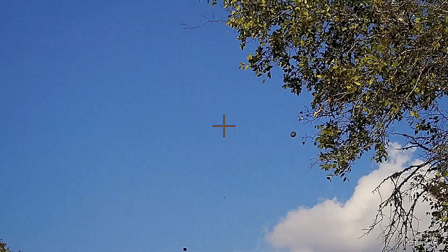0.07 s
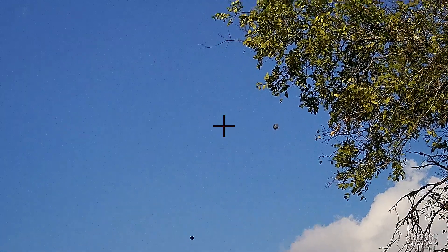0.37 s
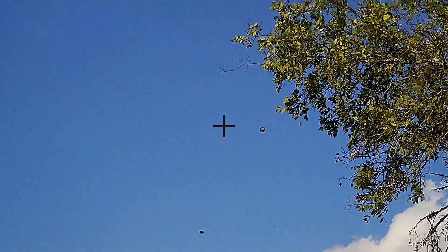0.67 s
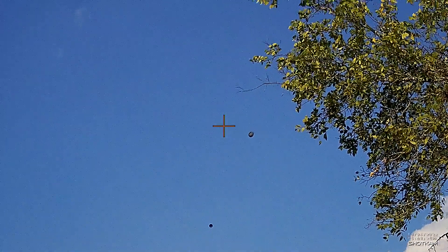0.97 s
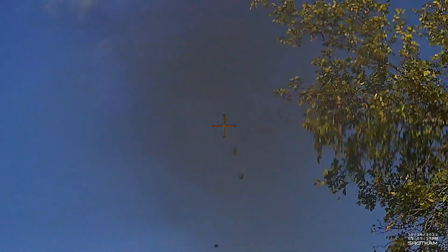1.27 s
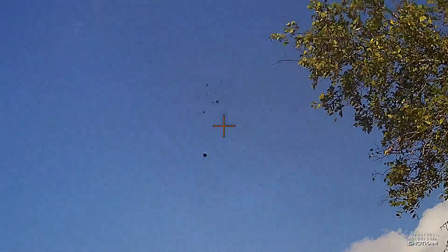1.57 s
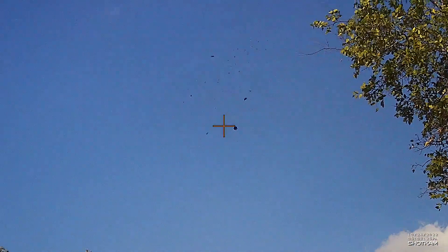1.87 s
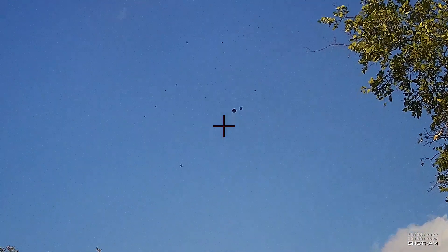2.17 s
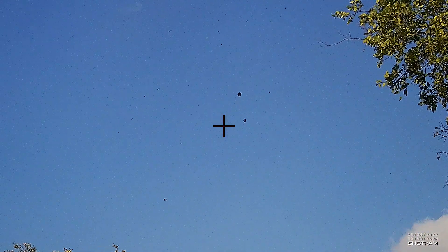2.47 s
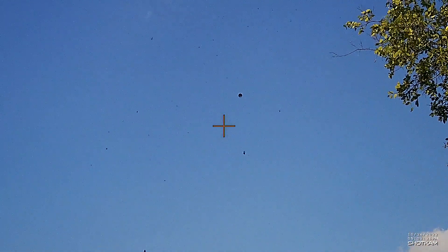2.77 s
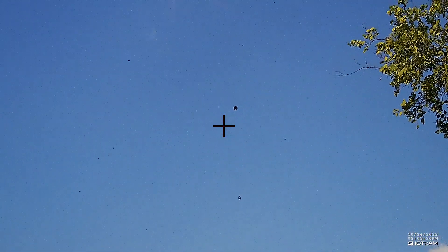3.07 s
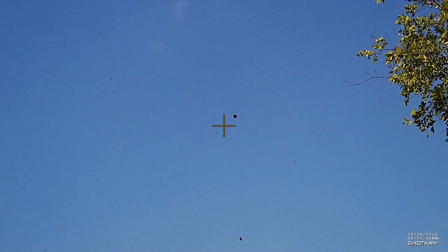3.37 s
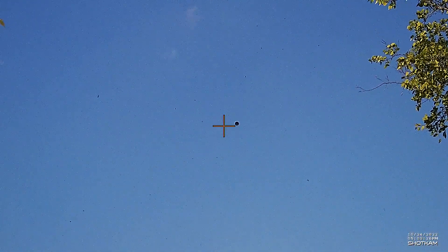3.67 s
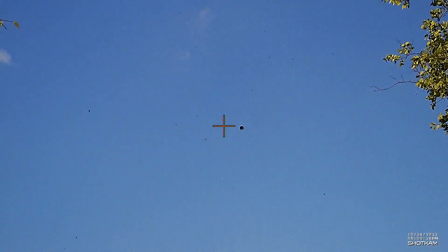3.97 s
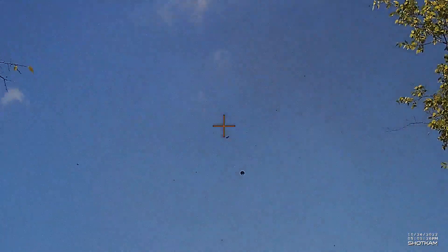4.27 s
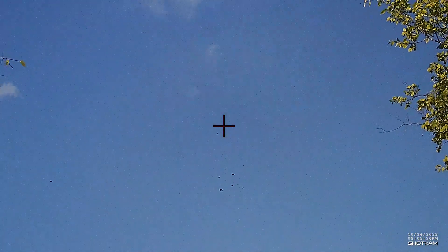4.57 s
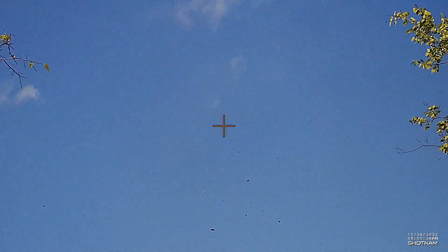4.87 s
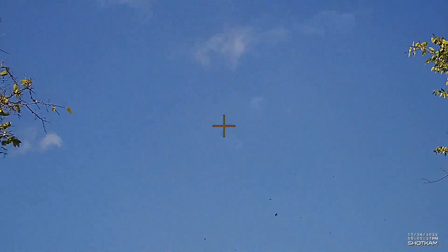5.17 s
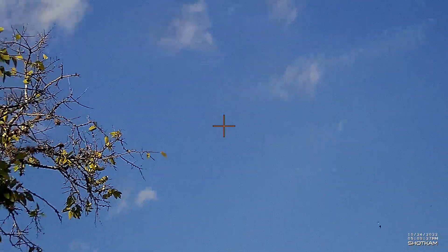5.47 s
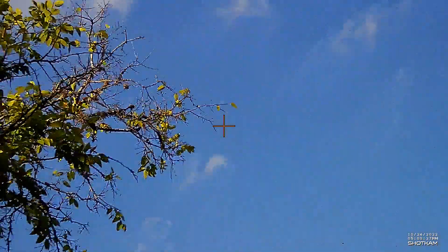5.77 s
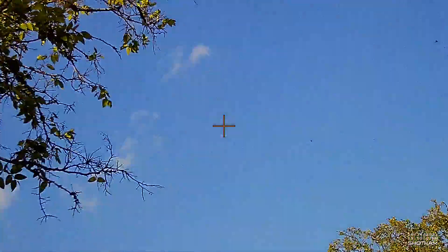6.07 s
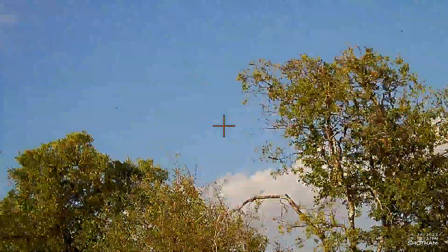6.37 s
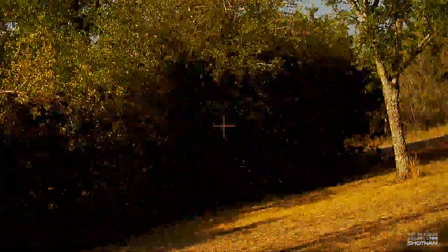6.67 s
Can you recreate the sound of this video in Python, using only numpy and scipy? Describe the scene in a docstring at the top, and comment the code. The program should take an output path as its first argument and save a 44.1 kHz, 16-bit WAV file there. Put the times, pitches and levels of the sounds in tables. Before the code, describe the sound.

A self-loading shotgun fires twice right at the microphone outdoors, distorted and clattering, with rolling echoes and faint distant shots.

```python
"""At an outdoor clay range, a self-loading shotgun fires twice, heard by a small camera on its barrel.
Each blast and kick overloads the microphone, and the steel clatter of reloading breaks through in bursts.
Banks and tree lines throw each shot back. The trigger clicks between shots, and guns pop at far stands.
At the end the gun is lowered, with wind, rustling and a few knocks over a quiet hiss."""
import sys
import numpy as np
from scipy import signal
from scipy.fft import rfft, irfft, next_fast_len
from scipy.io import wavfile

SR = 44100
rng = np.random.default_rng(int(sys.argv[2]) if len(sys.argv) > 2 else 0)


def waveform_to_disk(signal):
    """Save audio, clipped to [-1, 1], as 16-bit WAV at the path in sys.argv[1]."""
    frames = np.transpose(np.atleast_2d(signal))
    scaled = np.clip(frames, -1, 1) * 32767
    samples = np.round(scaled).astype(np.int16)
    wavfile.write(sys.argv[1], SR, samples)


N = 300321
TIME = np.arange(N) / SR


# The two shots: t/s, blast level/dB (the gas plays 6 dB lower), echo roll level/dB, ringing level/dB
SHOTS = [(1.1859, 15.5, -32, -32.5), (4.0584, 15, -33, -33)]

def shotgun():
    """Each shot sets off a blast, a kick, the reloading and a low boom."""
    out = np.zeros(N)
    for shot, (fired, blast_db, _, ring_db) in enumerate(SHOTS):
        add(out, fired, blast(gas_db=blast_db - 6))
        add(out, fired, kick(shot))
        add(out, fired, reloading(shot, ring_db))
        add(out, fired, boom())
    return out


# Tone of the gas leaving the muzzle: f/Hz, level/dB
GAS_SPECTRUM = [(40, -10.5), (125, -11.5), (180, 5.5), (230, -0.5), (310, -18), (440, -0.5), (570, -3.5),
                (800, -4), (1100, -6.5), (1600, -26.5), (2400, -20.5), (6000, -36.5), (9000, -53.5)]

def blast(gas_db, barrel_db=8, barrel_hz=620, sag_hz=60, peak_s=.0065, width_s=.0028):
    """The barrel rings first, sagging in pitch; then the rush of gas from the muzzle drowns it."""
    t = TIME[:SR // 2]
    hz = barrel_hz - sag_hz * np.minimum(t / peak_s, 2)
    swell = np.exp(-.5 * ((t - peak_s) / width_s) ** 2) * np.minimum(t / .0017, 1)
    barrel = np.sin(2 * np.pi * np.cumsum(hz) / SR) * swell
    gas = noise(GAS_SPECTRUM, len(t)) * np.minimum(t / .013, 1) ** 4 * np.exp(-t / .038)
    return amp(barrel_db) * barrel + amp(gas_db) * gas


# Jolts of the camera: t/s after firing, length/s, push/full scale in shot 1, the same in shot 2
CAMERA_JOLTS = [(0.01, 0.011, 2, 1.5), (.0225, .0222, 17.5, 20), (0.046, .008, -2.5, -2),
                (0.056, 0.01, 0.52, 2.75), (.076, .0052, 2.35, 3), (0.1108, 0.0073, .5, 1.76)]

def kick(shot, shoulder_s=.061):
    """The kicking gun throws the camera to and fro and runs into the shoulder."""
    out = np.zeros(SR)
    for s, length, *pushes in CAMERA_JOLTS:
        arch = np.sin(np.pi * np.arange(0, length, 1 / SR) / length)
        add(out, s, pushes[shot] * np.sqrt(abs(arch)))
    add(out, shoulder_s, shoulder_stop())
    return out


def shoulder_stop(push=30, settle_s=.027, bounce_hz=52, bounce_decay_s=.034, travel=3.0):
    """The shoulder stops the gun: one big shove dies away while the camera bounces on its clamp."""
    t = TIME[:SR]
    bounce = .34 * np.cos(2 * np.pi * bounce_hz * t) * np.exp(-t / bounce_decay_s)
    swing = push * np.minimum(t / .024, 1) * (bounce - np.exp(-t / settle_s))
    return np.maximum(swing, -travel)  # the clamp can only move so far


# The bolt (the sliding steel block) unlocks, runs back and hits its stop; a shell is lifted; the bolt
# runs forward and locks; the parts settle: t/s after firing, decay/s, shot 1 level/dB, shot 2 level/dB
BOLT_CLACKS = [(.014, .009, -6, -5.5), (.046, 0.008, -5.5, -6.5), (.077, .006, -20.5, -5.5),
               (.099, .002, -30.5, -3), (0.115, 0.013, -5, -8), (0.135, .009, -12, -11),
               (0.149, .004, -3, -5), (.16, .01, -11, -10), (.171, .0025, -18, -16),
               (0.179, 0.0024, -30, -22), (.188, .004, -21, -26), (.197, .0025, -18.5, -26),
               (0.249, .0017, -51, -34)]
# Tone of the ringing gun: f/Hz, level/dB
RING_SPECTRUM = [(900, -4), (1700, 0), (2150, 8), (2600, -4.5), (3150, 5), (3700, -7.5), (4300, -5),
                 (4900, -13), (5450, -4), (6000, -18.5), (9000, -31)]

def reloading(shot, ring_db, shut_s=.173, rattles_per_s=170, drop_s=.032, linger_s=.19):
    """The bolt clacks back and forth; once it shuts, loose parts rattle and the gun rings on."""
    out, t = np.zeros(2 * SR), TIME[:SR * 3 // 2]
    for s, decay_s, *levels_db in BOLT_CLACKS:
        add(out, s, clack(levels_db[shot], decay_s))
    for k, (jitter, strength) in enumerate(rng.random((16, 2))):
        since = (k + jitter) / rattles_per_s
        add(out, shut_s + since, 2 * strength * np.exp(-since / .03) * clack(-23, decay_s=.0015))
    fade = np.exp(-t / drop_s) + amp(-16.5) * np.exp(-t / linger_s)
    add(out, shut_s, amp(ring_db) * noise(RING_SPECTRUM, len(t)) * fade)
    return out


# Tone of struck steel: f/Hz, level/dB
STEEL_SPECTRUM = [(100, -27.5), (400, -18), (700, 5), (1100, -6), (1700, -12.5), (2200, -10.5),
                  (3300, -4.5), (3900, -13), (4600, -6), (4900, -0.5), (5300, -13.5), (5900, -19.5),
                  (7300, -13), (9000, -28.5)]

def clack(db, decay_s, note_hz=4790):
    """Steel hits steel: a burst of noise and the short note of the bolt."""
    t = TIME[:SR // 8]
    note = amp(-7.5) * np.sin(2 * np.pi * note_hz * t) * np.exp(-t / .0017)
    burst = noise(STEEL_SPECTRUM, len(t)) * np.exp(-t / decay_s)
    return amp(db) * (burst + note) * np.minimum(t / .0004, 1)


# Tone of the low boom: f/Hz, level/dB
BOOM_SPECTRUM = [(12, -2), (25, -1.5), (45, -5), (80, -13), (150, -21), (300, -55)]

def boom(db=-30, rise_s=.05, decay_s=.23):
    """The range sends back a deep rumble after a shot."""
    t = TIME[:2 * SR]
    return amp(db) * noise(BOOM_SPECTRUM, len(t)) * np.minimum(t / rise_s, 1) * np.exp(-t / decay_s)


# Echoes off banks and tree lines:
# t/s after firing, swell/s, f/Hz, spread/octaves, shot 1 level/dB, shot 2 level/dB
BANK_AND_TREE_ECHOES = [(.159, 0.028, 708.4, 0.32, -29, -49), (.238, 0.0095, 246, 0.3, -18, -41),
                        (.258, 0.0079, 800, 0.71, -28.5, -28), (0.277, 0.0031, 226, 0.48, -26, -25),
                        (.368, 0.0057, 335, .9, -42, -33.5), (.395, 0.0021, 695, 0.51, -21.5, -43),
                        (0.547, 0.0099, 230, 0.17, -43, -39.5), (.626, .0045, 254.8, 0.75, -35.5, -31.5),
                        (.777, 0.0022, 1060, 1.04, -31, -30.5), (0.78, 0.0037, 2970, 0.28, -58, -62.5),
                        (1.359, 0.0061, 230, .44, -47.5, -51.5), (1.619, 0.0058, 620, 0.7, -54, -70)]

def echoes():
    """Each shot comes back as a long roll and as separate thuds from the same banks and trees."""
    out = np.zeros(N)
    for shot, (fired, _, roll_db, _) in enumerate(SHOTS):
        add(out, fired, roll(roll_db, hold_s=.24, lumpy_db=2.5))
        for delay, swell_s, hz, octaves, *levels_db in BANK_AND_TREE_ECHOES:
            add(out, fired + delay, thud(levels_db[shot], swell_s, hz, octaves))
    return out


def roll(db, hold_s, lumpy_db, slaps_per_s=45, dull_hz=1650, absorb_db_per_s=9.5):
    """Countless small echoes off trees and ground come in clumps and slaps, dulled by distance."""
    t = TIME[:SR * 7 // 2]
    late = np.maximum(t, hold_s)  # no fading while the near trees answer
    fade_db = -22 * np.log10(late / hold_s) - absorb_db_per_s * (late - hold_s)  # spreads, is soaked up
    level = amp(db + fade_db + lumpy_db * wander(len(t), per_s=40))
    slaps = evened((rng.random(len(t)) < slaps_per_s / SR) * rng.uniform(-1.1, 1, len(t)))
    scatter = low_pass(rng.standard_normal(len(t)) + .33 * slaps, dull_hz, size=201)
    return evened(housing(scatter)) * level * np.minimum(t / .0033, 1)


# Tone of the trigger's click: f/Hz, level/dB
TRIGGER_SPECTRUM = [(300, -33), (900, 15), (2500, -1), (4000, 2), (5000, -7), (7200, -10), (8000, -34.5)]

def trigger_click(s=1.6525, db=-31, decay_s=.0039, rebound_s=.011):
    """The trigger is let forward between the shots: a dry click and a softer rebound."""
    out, t = np.zeros(N), TIME[:SR // 10]
    for delay, level_db in (0, db), (rebound_s, db - 10):
        add(out, s + delay, amp(level_db) * noise(TRIGGER_SPECTRUM, len(t)) * np.exp(-t / decay_s))
    return out


# Shots at far stands: t/s, pop level/dB, echo roll level/dB
FAR_SHOTS = [(.585, -37, -57.5), (5.851, -33, -59.5)]

def far_guns(echo_s=.29):
    """Distant guns pop, each followed by one soft echo and a roll."""
    out = np.zeros(N)
    for s, db, roll_db in FAR_SHOTS:
        add(out, s, roll(roll_db, hold_s=.38, lumpy_db=1.54))
        add(out, s, thud(db - 27, swell_s=.0017, hz=2460, octaves=.24))  # crack
        add(out, s, thud(db, swell_s=.0026, hz=990, octaves=1.0))  # pop
        add(out, s, thud(db - 6, swell_s=.00383, hz=231, octaves=.25))  # low body
        add(out, s, thud(db - 24, swell_s=.021, hz=1100, octaves=.52))  # scatter from trees on the way
        add(out, s + echo_s, thud(db - 24.5, swell_s=.022, hz=244, octaves=.45))
    return out


# Tone of wind on the microphone: f/Hz, level/dB
WIND_SPECTRUM = [(10, -0.5), (30, -1.5), (55, -19.5), (110, -17.5), (200, -35), (600, -59)]
# Tone of the rustling: f/Hz, level/dB
RUSTLE_SPECTRUM = [(100, -9), (250, 6.5), (400, -7), (620, -3), (900, -7.5), (1300, -24.5), (2000, -28)]
# Small knocks as the gun is handled: t/s, level/dB, f/Hz
HANDLING_KNOCKS = [(3.807, -62, 862), (6.298, -55.5, 876), (6.367, -44.5, 346), (6.599, -53.5, 600)]

def handling(start_s=5.3, rise_s=.67, end_s=6.9, fall_s=.34, rubs_per_s=8.8):
    """Wind, rustling and short rubs grow with the gun's speed as it is lowered; a few knocks join in."""
    speed = np.clip(np.minimum((TIME - start_s) / rise_s, (end_s - TIME) / fall_s), 0, 1)
    aiming = amp(-24)  # a little is heard even while the gun is still
    gusts = amp(-51 + 3.5 * wander(N, per_s=12))
    wind = gusts * noise(WIND_SPECTRUM) * (speed + aiming)
    rustle = amp(-63) * noise(RUSTLE_SPECTRUM) * (speed ** 2 + aiming)
    out = wind + rustle
    for k, (jitter, pitch) in enumerate(rng.random((24, 2))):
        s = start_s + (k + jitter) / rubs_per_s
        rub = thud(-64.5, swell_s=.0048, hz=700 * 2 ** (pitch - .5), octaves=.265)
        add(out, s, np.interp(s, TIME, speed) ** 2 * rub)
    for s, db, hz in HANDLING_KNOCKS:
        add(out, s, thud(db, swell_s=.0022, hz=hz, octaves=.67))
    return out


# Tone of the background: f/Hz, level/dB
HISS_SPECTRUM = [(12, -33.5), (20, -0.5), (96, -18.5), (204, -21), (241, -13), (357, -31.5), (399, -26),
                 (976, -32.5), (7110, -37.5), (9140, -53.5), (16000, -68)]

def hiss(db=-60.5):
    """A quiet, steady hiss with a low rumble under it."""
    return amp(db) * noise(HISS_SPECTRUM)


# Notes at which the camera's case rings: f/Hz, width/Hz, level/dB
CASE_NOTES = [(239.7, 31, 3), (591.3, 48, -6), (644.3, 67, -3.5), (1063, 110, -8.5), (1264, 80, -14.5),
              (2020, 100, -30.5), (3270, 130, -34.5)]

def housing(x):
    """Outside sound reaches the sealed microphone by making the camera's case ring."""
    out = np.zeros(len(x))
    for hz, width, db in CASE_NOTES:
        ring = signal.lfilter(*signal.iirpeak(hz, hz / width, fs=SR), x)
        # a second, wider filter cuts more of what lies far from the note
        out += amp(db) * signal.lfilter(*signal.iirpeak(hz, hz / (4 * width), fs=SR), ring)
    return out


def thud(db, swell_s, hz, octaves):
    """A short push of air, strongest around one pitch, leaves the camera's case ringing."""
    t = TIME[:16384]
    freqs = np.fft.rfftfreq(len(t), 1 / SR)
    shape = t / swell_s * np.exp(1 - t / swell_s)
    band = np.exp(-.5 * (np.log2((freqs + 1) / hz) / octaves) ** 2)
    phases = np.exp(2j * np.pi * rng.random(len(freqs)))
    burst = housing(shape * irfft(band * phases))
    return amp(db) * burst * np.linalg.norm(shape) / np.linalg.norm(burst)


def noise(spectrum, size=N):
    """Noise of strength 1; the spectrum only sets how its low and high pitches compare."""
    n = next_fast_len(size)
    hz, db = np.transpose(spectrum)
    gains = amp(np.interp(np.log(np.fft.rfftfreq(n, 1 / SR) + 1), np.log(hz + 1), db))
    return evened(irfft(rfft(rng.standard_normal(n)) * gains, n)[:size])


def wander(size, per_s):
    """A random curve that drifts roughly between -1 and 1."""
    points = rng.standard_normal(2048)
    return np.interp(TIME[:size] * per_s, np.arange(len(points)), points)


def low_pass(x, hz, size):
    """Cuts the treble above hz; a larger size makes the cut sharper."""
    return signal.oaconvolve(x, signal.firwin(size, hz, window=("kaiser", 8), fs=SR), "same")


def amp(db):
    """Turns decibels into a number to multiply by."""
    return 10 ** (np.asarray(db) / 20)


def evened(x):
    """Scales a sound to an average strength (rms) of 1."""
    return x / np.sqrt(np.mean(x ** 2) + 1e-20)


def add(mix, s, sound):
    """Mixes a sound in, starting at s seconds."""
    part = mix[round(s * SR):][:len(sound)]
    part += sound[:len(part)]


def scene():
    """Everything that reaches the microphone, in one channel."""
    return (shotgun() + trigger_click() + echoes() + far_guns() + handling() + hiss())[None]


def record(dry, input_limit=.69, output_limit=.705, band_hz=8100, notch_hz=7950, droop_s=.115):
    """The camera overloads and flattens loud peaks; its filters overshoot and are flattened again."""
    fine = signal.resample_poly(dry[0], up=2, down=1)
    flattened = signal.resample_poly(np.clip(fine, -input_limit, input_limit), up=1, down=2)
    treble = signal.sosfilt(signal.butter(2, 1500, "high", fs=SR, output="sos"), dry[0])
    dulled = low_pass(flattened + amp(-38) * treble, band_hz, size=81)  # a trace slips past the overload
    # this narrow cut rings thinly after each burst
    notched = signal.lfilter(*signal.iirnotch(notch_hz, notch_hz / 140, fs=SR), dulled)
    centred = signal.lfilter([1, -1], [1, -np.exp(-1 / (droop_s * SR))], notched)  # a held push sags to 0
    return low_pass(np.clip(centred, -output_limit, output_limit), hz=16300, size=301)[None]


dry = scene()
out = record(dry)
waveform_to_disk(out)
```